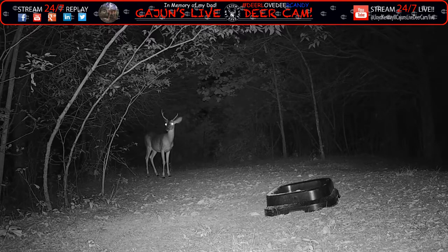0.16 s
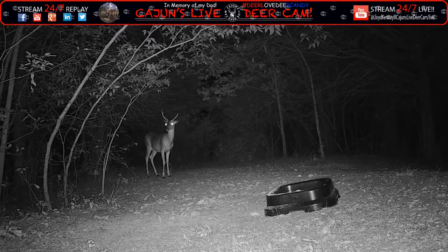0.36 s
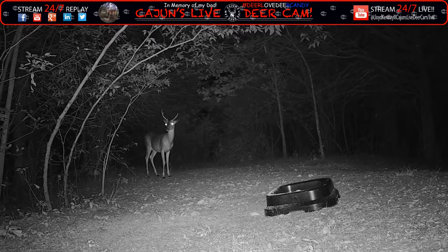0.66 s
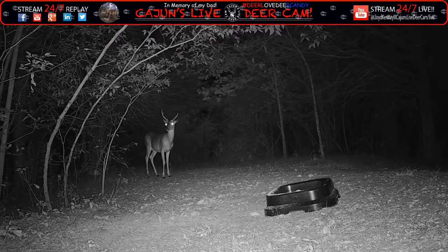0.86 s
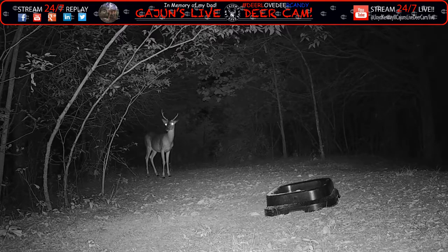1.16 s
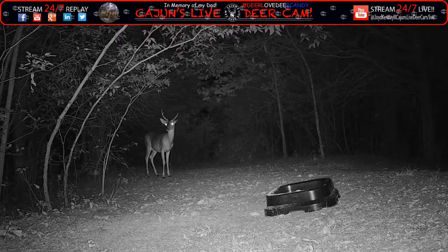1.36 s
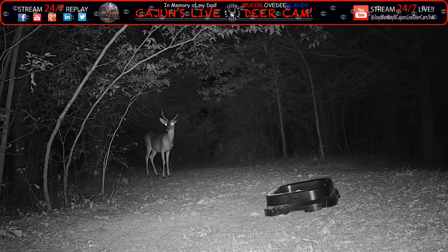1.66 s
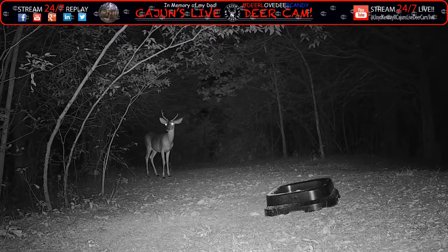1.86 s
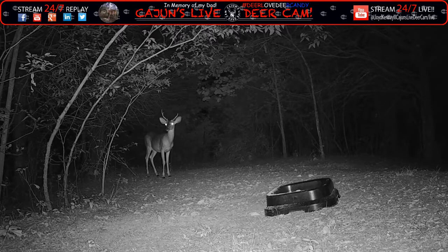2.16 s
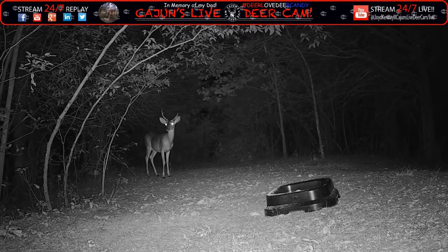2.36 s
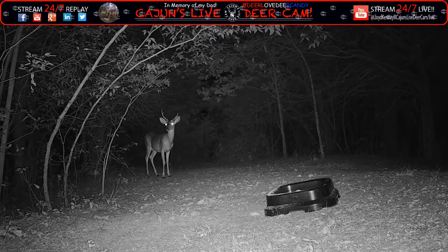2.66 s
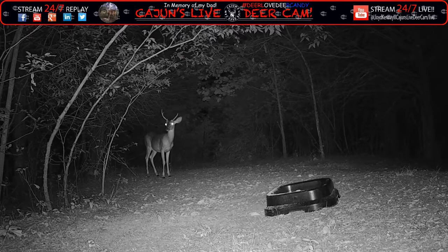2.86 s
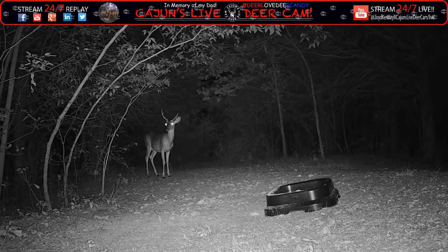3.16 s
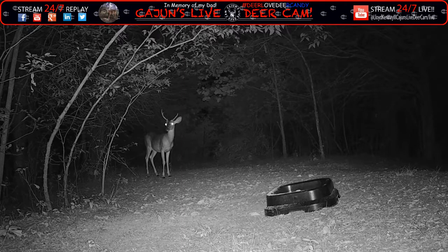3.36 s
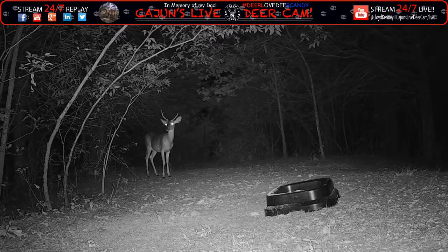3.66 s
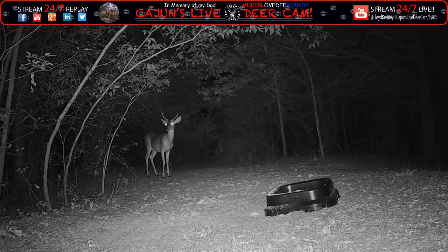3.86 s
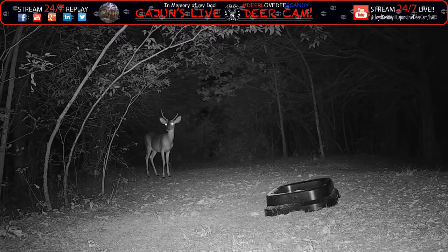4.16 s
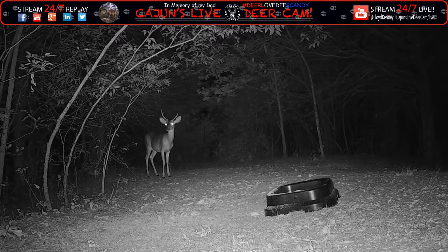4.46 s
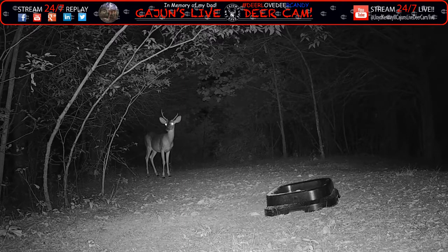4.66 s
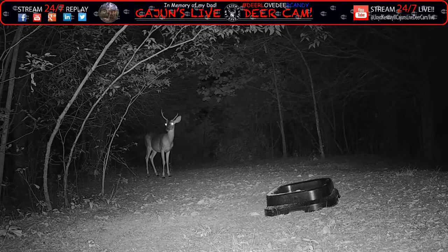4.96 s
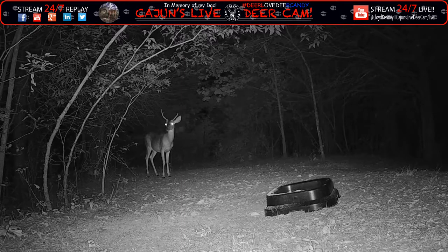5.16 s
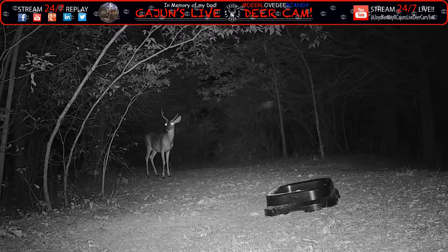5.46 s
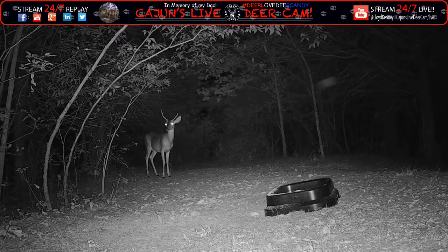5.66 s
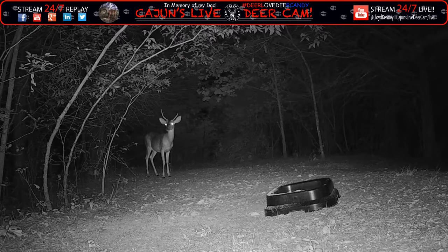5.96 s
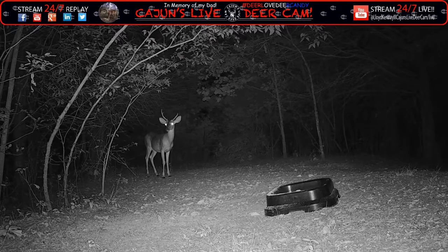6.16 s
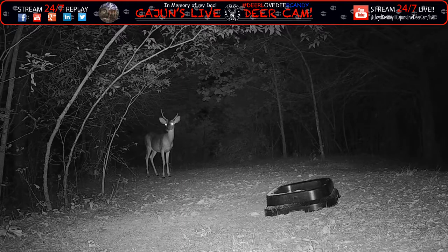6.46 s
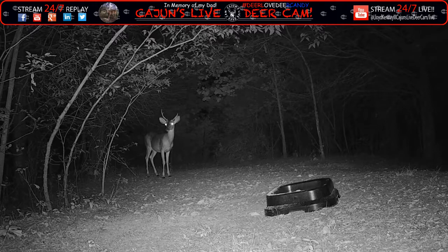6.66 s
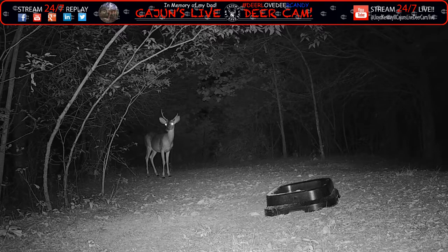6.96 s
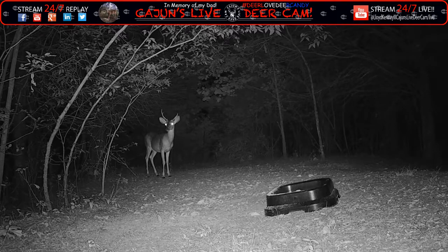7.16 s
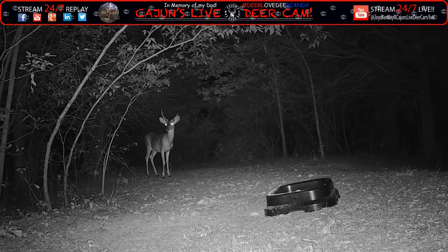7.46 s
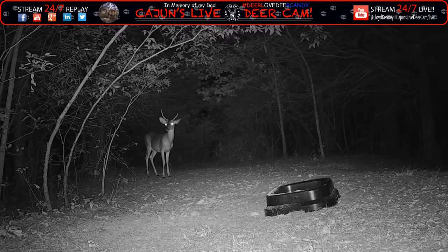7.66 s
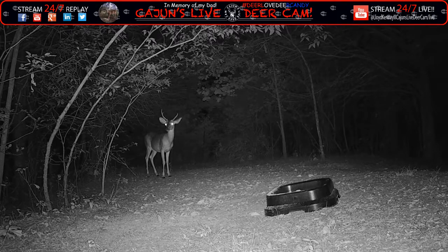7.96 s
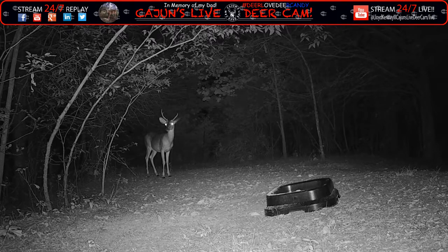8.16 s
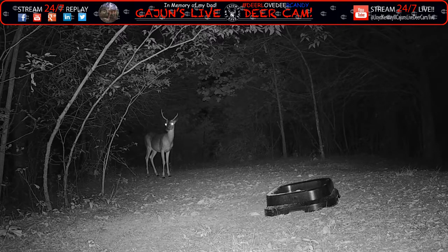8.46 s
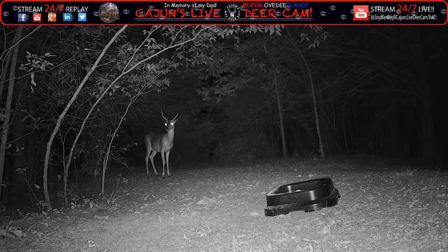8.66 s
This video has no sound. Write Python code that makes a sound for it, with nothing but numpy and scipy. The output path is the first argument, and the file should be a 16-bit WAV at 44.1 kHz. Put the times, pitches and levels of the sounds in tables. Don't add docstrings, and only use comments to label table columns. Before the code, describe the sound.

At a wood's edge at night, several near crickets chirp in short, quick-pulsed bursts, sometimes answering or overlapping. Other insects trill without pause beneath them, and distant crowds blur into high shimmering bands, one gently throbbing. A far road rumbles low, swelling softly as vehicles pass. A single fixed microphone adds smooth hiss and thin electrical whine; the sound is centred. The standing deer makes no sound.

```python
import sys
import numpy as np
from scipy import signal
from scipy.fft import rfft, irfft
from scipy.io import wavfile
from scipy.ndimage import uniform_filter1d

SR = 44100
rng = np.random.default_rng(int(sys.argv[2]) if len(sys.argv) > 2 else 0)


def invert_db(x):
    u = np.asarray(x, float) / 20
    return 10 ** u


def put_to_file(sound):
    columns = np.atleast_2d(sound).T
    safe = np.clip(columns, -1, 1)
    whole_steps = np.round(safe * 32767)
    wavfile.write(sys.argv[1], SR, whole_steps.astype(np.int16))


N = 388961
TIME = np.arange(N) / SR
BINS = np.maximum(np.arange(N // 2 + 1) * SR / N, 1)
CUTOFF_HZ = 15730


def rms_one(x):
    return x / np.sqrt(np.mean(x ** 2) + 1e-20)


def drift(rate_hz):
    r = np.exp(-80 * np.pi * rate_hz / SR)
    white = rng.standard_normal(N // 40 + 2002)
    slow = signal.lfilter([1], [1, -2 * r, r * r], white)
    settled = slow[2000:] / np.std(slow[1000:])
    return np.interp(np.arange(N) / 40, np.arange(len(settled)), settled)


def swell(peak_s, span_s):
    return np.exp(-.5 * ((TIME - peak_s) / span_s) ** 2)


def shaped_noise(gain):
    return rms_one(irfft(rfft(rng.standard_normal(N)) * gain, N))


def colour(points):
    hz, db = np.transpose(points)
    return invert_db(np.interp(np.log(BINS), np.log(hz), db))


def hump(hz, width_hz, skirt):
    return 1 / (1 + np.abs(2 * (BINS - hz) / width_hz) ** skirt)


def cricket(hz, strokes_hz, duty, fall_hz, jitter, flicker_db, slip_rad):
    count = strokes_hz * TIME + jitter * drift(1.2) + 1 + rng.random()
    within = np.minimum(count % 1 / np.clip(duty, .2, 1), 1)
    slips = np.cumsum(slip_rad * rng.standard_normal(1000))[count.astype(int)]
    pitch_hz = hz - fall_hz * (within ** 2 - .45) + 8 * drift(3.0)
    tone = np.sin(2 * np.pi * np.cumsum(pitch_hz) / SR + slips)
    stroke = np.sin(np.pi * within) ** .7
    return rms_one(stroke * tone * invert_db(flicker_db * drift(9)))


def wood(x, t60_s, wet_db):
    lag_s = np.arange(int(.4 * SR)) / SR
    tail = rng.standard_normal(len(lag_s)) * invert_db(-60 * lag_s / t60_s)
    tail = tail / np.sqrt(np.sum(tail ** 2))
    return x + invert_db(wet_db) * signal.fftconvolve(x, tail)[:N]


def phrasing(rows):
    attack_s, release_s = .04, .015
    out = 0
    for start_s, length_s, db in rows:
        rise = (TIME - start_s) / attack_s + 0.3
        fall = (start_s + length_s - TIME) / release_s
        out = out + invert_db(db) * np.clip(np.minimum(rise, fall), 0, 1) * (TIME >= start_s)
    return out


# (start [s], length [s], level [dB])
LEAD_PHRASES = [(0, .22, -33), (.6, .22, -41), (1.38, .42, -38.5), (2.05, .43, -36), (3.27, .3, -37.5),
                (3.82, .51, -35), (5.5, .44, -39), (5.7, .24, -42), (6.04, .26, -34.5), (7.03, .25, -37),
                (7.45, .33, -38.5), (8.15, .25, -36), (8.47, .28, -37.5)]
RIVAL_PHRASES = [
    (.82, .36, -35.5),
    (1.4, .3, -43),
    (2.5, .5, -45),
    (3.28, .35, -35.5),
    (4.42, .28, -43),
    (4.9, .5, -43),
    (6.2, .35, -35),
    (6.92, .36, -42),
    (7.5, .28, -41),
    (8.62, .25, -35.5),
]
HIGH_PHRASES = [(.42, .31, -41), (.92, .25, -43.5), (2.3, .45, -43.5), (2.8, .35, -44), (3.83, .37, -46),
                (4.35, .35, -41), (5.7, .25, -43), (6.5, .4, -44.5), (6.92, .36, -44), (7.82, .3, -44),
                (8.2, .25, -45)]
LOW_PHRASES = [
    (1.4, .3, -51),
    (2.3, .2, -53),
    (3.32, .25, -47),
    (6.6, .3, -52),
    (8.55, .25, -52),
]


def near_crickets():
    singers = ((LEAD_PHRASES, 4702), (RIVAL_PHRASES, 4588), (HIGH_PHRASES, 4842), (LOW_PHRASES, 4320))
    out = 0
    for rows, hz in singers:
        wandering_hz = hz + 6 * drift(.7)
        song = cricket(wandering_hz, hz / 109, duty=.85, fall_hz=85, jitter=.06, flicker_db=.9, slip_rad=.45)
        out = out + phrasing(rows) * song
    return wood(invert_db(-.3) * out, t60_s=.18, wet_db=-11)


# (wing pitch [Hz], strokes [1/s], level [dB])
TRILLERS = [(2300, 43.2, -53), (2350, 46.4, -54), (2560, 41.2, -45.5), (2660, 40.0, -48), (2720, 39.9, -49),
            (2740, 43.5, -50), (3560, 45.5, -59), (3720, 48.5, -60), (5500, 70.0, -58), (5750, 69.0, -55),
            (6700, 22.0, -64)]


def steady_crickets():
    out = 0
    for hz, strokes_hz, db in TRILLERS:
        level = invert_db(db + .5 * drift(.8))
        out = out + level * cricket(hz, strokes_hz, duty=.72, fall_hz=120, jitter=.03, flicker_db=.8, slip_rad=.3)
    joining = np.clip((TIME - 6.6) / .3, 0, 1)
    late = invert_db(-69) * shaped_noise(hump(7340, 120, skirt=3)) * joining
    return wood(out, t60_s=0.23, wet_db=-12.5) + late


# (centre [Hz], width [Hz], level [dB])
CROWDS = [(2331, 230, -48.5), (2477, 250, -45), (2640, 126, -44), (3450, 720, -51.5), (4220, 470, -55.5),
          (4690, 330, -44.5), (5340, 600, -51), (5680, 735, -38), (6740, 460, -54), (7250, 550, -61.5)]
# (centre [Hz], width [Hz], level [dB])
THROBBERS = (3650, 470, -0.56)


def far_choruses():
    bands = sum(invert_db(db + drift(2.9) / 4) * shaped_noise(hump(hz, width_hz, skirt=2.36))
                for hz, width_hz, db in CROWDS)

    throb_hz, throb_peak_s = 3.78, 4.16
    beat = np.cos(2 * np.pi * (throb_hz * (TIME - throb_peak_s) + .1 * drift(.4)))
    hz, width_hz, db = THROBBERS
    level_db = -48.5 + 3.5 * swell(6.95, .6) + 0.43 * drift(1.5)
    throbbers = invert_db(db + 2.0 * beat + level_db) * shaped_noise(hump(hz, width_hz, skirt=4.2))

    kin_rest_db, kin_join_db, kin_blur_s = -41, -6, .08
    near_power = phrasing(LEAD_PHRASES) ** 2 + phrasing(RIVAL_PHRASES) ** 2
    near_power = uniform_filter1d(near_power, int(kin_blur_s * SR))
    joining = np.sqrt(invert_db(2 * kin_rest_db) + invert_db(2 * kin_join_db) * np.abs(near_power))
    return bands + throbbers + joining * shaped_noise(hump(4625, 340, skirt=2.7))


# (frequency [Hz], density [dB per Hz])
RUMBLE_COLOUR = [(15, -55), (25, -32), (54, -15.5), (108, -4), (162, -1.5), (241, -3), (278, -9.5),
                 (316, -9), (372, -13.5), (585, -15), (937, -28.5), (1900, -34.5), (2470, -40),
                 (4180, -120)]
# (drone [dB], engine band [dB], tyre band [dB])
QUIET_ROAD_DB = (-32.5, -36.5, -40)
# (drone [dB], engine band [dB], tyre band [dB])
WAVER_DB = (.7, .7, .3)
# (nearest [s], span [s], drone rise [dB], engine rise [dB], tyre rise [dB])
VEHICLES = [
    (.4, 1, 1.5, 4.5, 0),
    (2.8, 1.15, -1.5, 3, 1.4),
    (6.6, .5, -1.5, 1, 1.3),
    (7.8, 0.52, 1, 1.5, 0),
]
# (centre [Hz], width [Hz],
# level [dB])
MACHINE_HUMS = [(119, 7, -40), (155, 5, -38.5), (190, 10, -44), (240, 10, -45), (500, 6, -54),
                (537, 6, -56), (720, 150, -52)]


def road():
    below_200, below_380 = [1 / (1 + (BINS / hz) ** 6) for hz in (200, 380)]
    shares = [below_200, below_380 - below_200, 1 - below_380]
    rises_db = sum(np.outer(rise_db, swell(nearest_s, span_s)) for nearest_s, span_s, *rise_db in VEHICLES)
    out = 0
    for share, db, rise_db, waver_db in zip(shares, QUIET_ROAD_DB, rises_db, WAVER_DB):
        level = invert_db(db + rise_db + waver_db * drift(2.17))
        out = out + level * shaped_noise(colour(RUMBLE_COLOUR) * np.sqrt(share))
    hums = sum(invert_db(db) * shaped_noise(hump(hz, width_hz, skirt=1.72)) for hz, width_hz, db in MACHINE_HUMS)
    return out + hums


# (frequency [Hz], density [dB per Hz])
HISS_COLOUR = [(900, -4), (2000, -19), (3000, 10.5), (4070, -1), (5000, 6.5), (7500, -1.5), (8500, -1.5),
               (10500, -4), (12200, -10), (13500, -5.5), (15500, -3)]
# (frequency [Hz], level [dB])
WHINE_TONES = [(1000, -69), (7500, -84), (8000, -79), (9001, -81), (10500, -87), (13500, -87), (15003, -83)]


def microphone_noise():
    whines = sum(invert_db(db) * np.sqrt(2) * np.sin(2 * np.pi * hz * TIME) for hz, db in WHINE_TONES)
    return invert_db(-48.5) * shaped_noise(colour(HISS_COLOUR)) + whines


def scene():
    mono = near_crickets() + steady_crickets() + far_choruses() + road() + microphone_noise()
    return np.array([mono, mono])


def noise_fill(x):
    fill_chance, fill_db, band_hz = .035, .5, 689
    out, spectrum = x.copy(), rfft(x[0])
    centres = np.arange(286, N + 2048, 1024)
    for low_hz in 9646 + band_hz * np.arange(9):
        band = (BINS >= low_hz) & (BINS < min(low_hz + band_hz, CUTOFF_HZ))
        part = irfft(spectrum * band, N)
        hit = np.interp(np.arange(N), centres, rng.random(len(centres)) < fill_chance)
        fill = np.std(part) * shaped_noise(band) * invert_db(fill_db)
        out += np.sin(np.pi / 2 * hit) ** 2 * (fill * [[1], [-1]] - .9 * part)
    return out


def low_pass(x):
    return signal.sosfilt(signal.butter(12, 17010, fs=SR, output="sos"), x)


def record(dry):
    cut = irfft(rfft(dry, axis=1) * (BINS < CUTOFF_HZ), N, axis=1)
    mix = noise_fill(cut)
    return low_pass(mix)


dry = scene()
out = record(dry)
put_to_file(out)
```